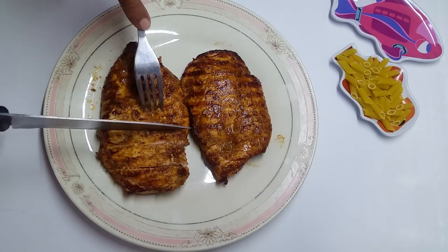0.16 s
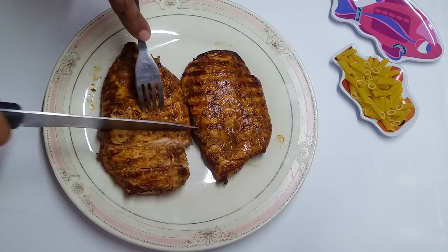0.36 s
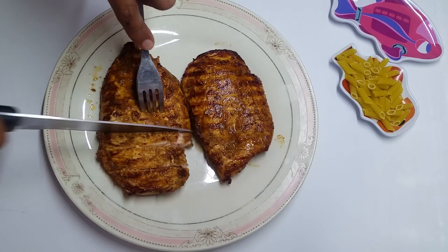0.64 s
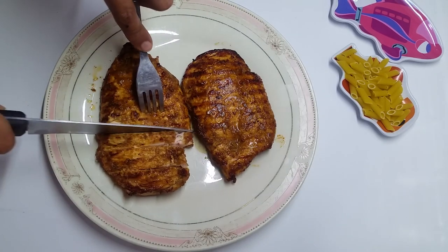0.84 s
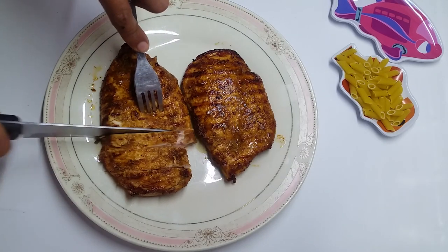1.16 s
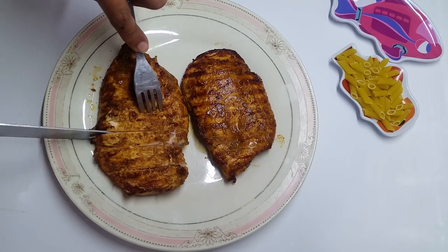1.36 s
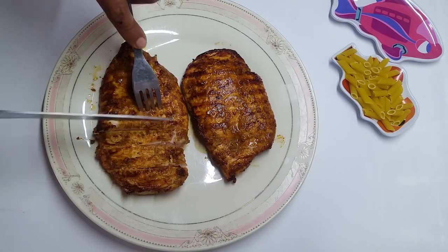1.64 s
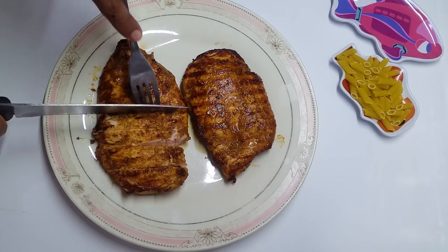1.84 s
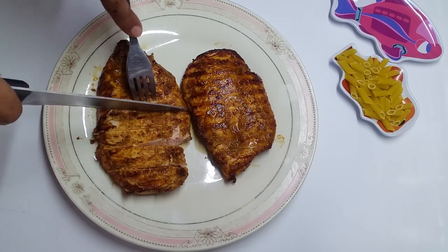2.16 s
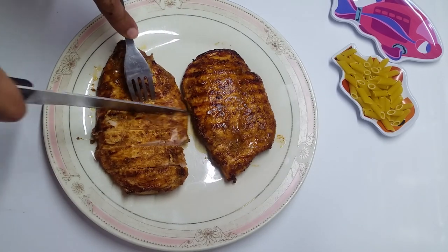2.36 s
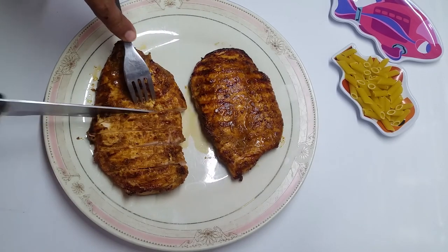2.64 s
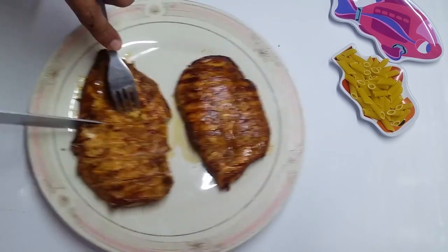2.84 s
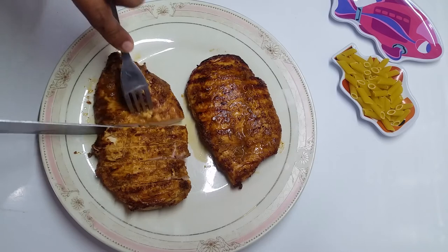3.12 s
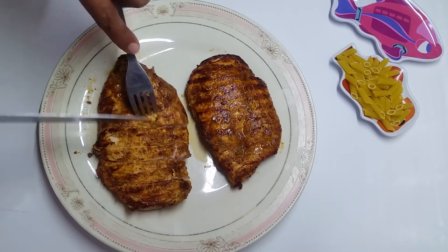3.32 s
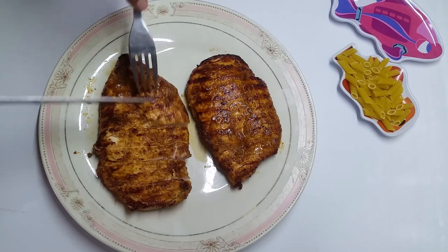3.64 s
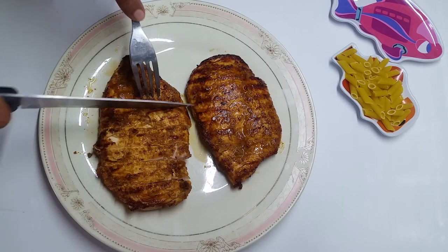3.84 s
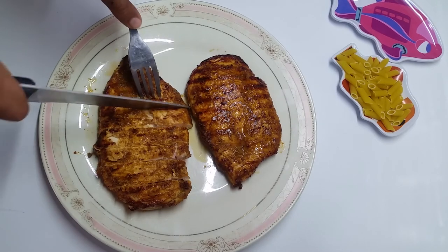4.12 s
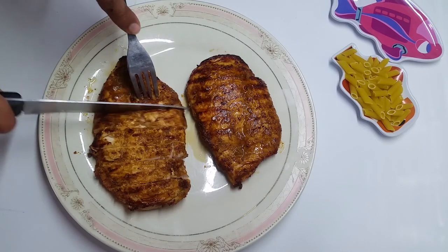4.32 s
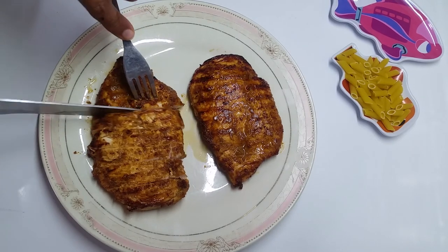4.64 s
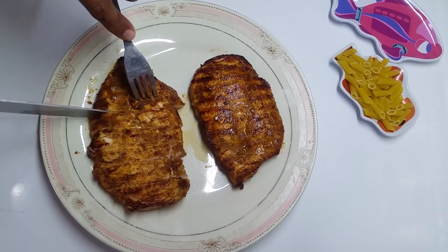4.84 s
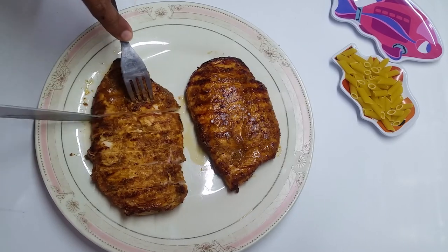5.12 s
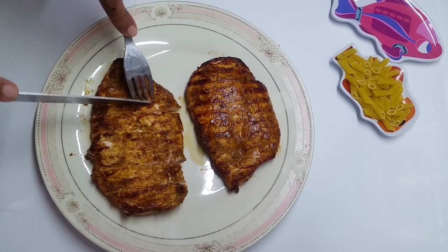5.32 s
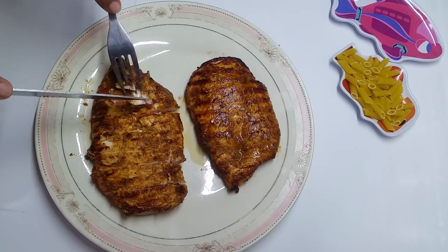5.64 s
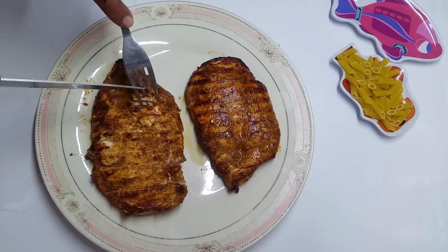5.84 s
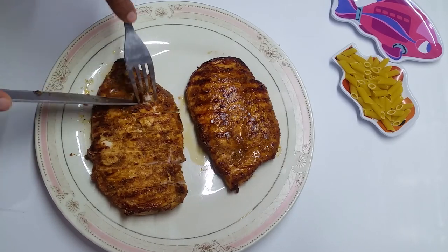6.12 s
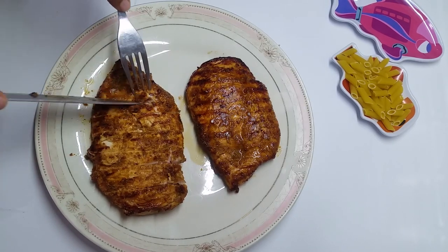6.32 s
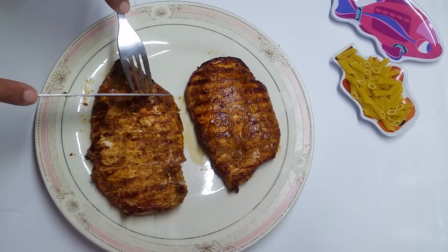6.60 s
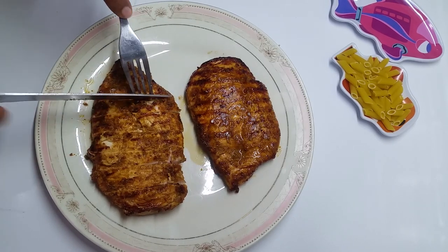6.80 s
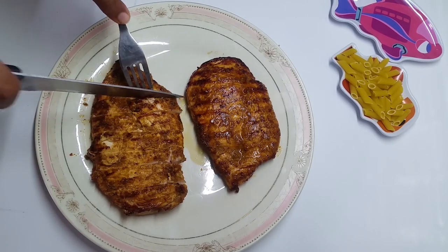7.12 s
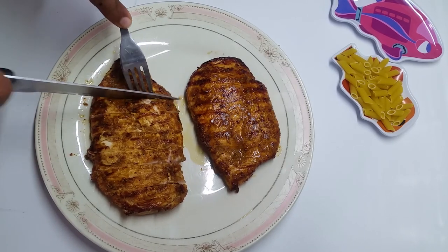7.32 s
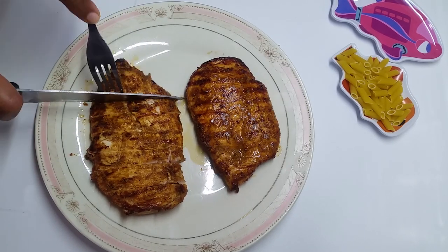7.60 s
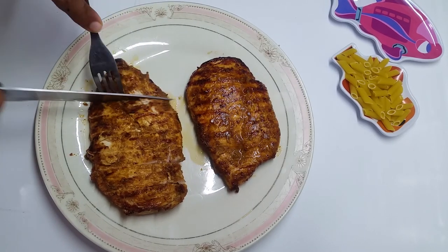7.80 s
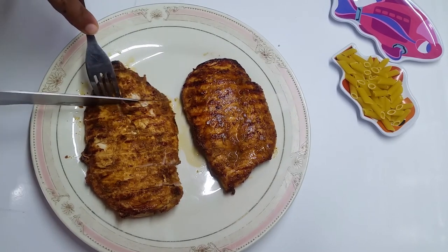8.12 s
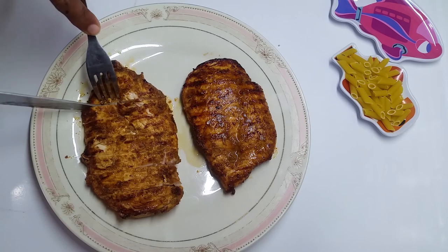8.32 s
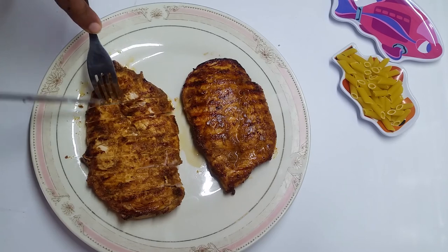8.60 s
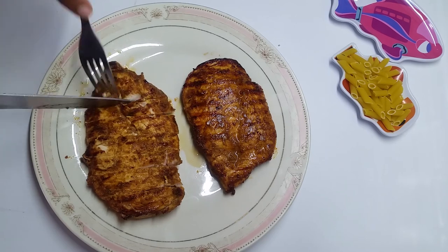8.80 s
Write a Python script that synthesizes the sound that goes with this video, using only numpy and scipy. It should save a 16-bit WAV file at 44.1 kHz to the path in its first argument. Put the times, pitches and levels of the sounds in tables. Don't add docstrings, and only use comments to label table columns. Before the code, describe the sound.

Steel cutlery scrapes and knocks a stoneware plate in busy strokes, then quiet taps and ticks, a steady fan hum, and one sharp final clack.

```python
import sys
import numpy as np
from scipy import signal
from scipy.fft import rfft, irfft
from scipy.io import wavfile
from scipy.ndimage import map_coordinates

SR = 44100
rng = np.random.default_rng(int(sys.argv[2]) if len(sys.argv) > 2 else 0)


def put_to_file(sound):
    columns = np.atleast_2d(sound).T
    safe = np.clip(columns, -1, 1)
    whole_steps = np.round(safe * 32767)
    wavfile.write(sys.argv[1], SR, whole_steps.astype(np.int16))


def voltage_ratio(decibels):
    exponent = np.asarray(decibels, float) / 20
    return 10 ** exponent


N = 394694

# (pitch [Hz], width [Hz], level [dB])
PLATE_MODES = [(680, 21, 2.5), (1210, 51, -2), (1468, 63, -2.5), (1662, 66, -3.5), (1960, 45, 3.5),
               (2320, 52, 1.5), (2525, 62, -2.5), (2760, 42, -3), (3574, 30, -6), (4550, 32, -9),
               (5400, 62, -30), (6700, 210, -38), (8000, 55, -21), (12900, 64, -23)]
RIM_MODES = [(1140, 40, -3), (1490, 40, -2), (1900, 36, 2), (2370, 45, -4), (2480, 45, -6), (2900, 36, -2),
             (3250, 60, -22), (3645, 28, 0), (4050, 80, -36), (4543, 36, -15), (5500, 45, -21),
             (6670, 110, -40), (8070, 28, -25)]
EDGE_MODES = [(600, 40, -2), (900, 60, -8), (1197, 70, 2), (1455, 36, 3), (1935, 40, 9), (2244, 47, 0),
              (2440, 36, 3), (2557, 90, 3), (2960, 45, -2), (3622, 34, 0), (4510, 36, -12), (5550, 50, -16),
              (6670, 110, -38), (8070, 28, -21)]
# (pitch [Hz], width [Hz], level [dB])
PINNED_MODES = [(1096, 28, -0.5), (1450, 44, 2.5), (2140, 69, -2.5), (2435, 37, 2.5), (2740, 26, -1),
                (3070, 40, -8), (3270, 35, -15), (3510, 35, -6.5), (4520, 36, -20), (5173, 60, -23),
                (5415, 60, -20), (6150, 72, -25), (8060, 50, -23)]
PRESSED_MODES = [(1205, 40, -5), (1500, 50, -5), (1596, 50, -9), (1803, 50, -9), (2013, 36, 2),
                 (2433, 45, -12), (2753, 40, -22), (3313, 40, -22), (3604, 40, -24)]
HELD_MODES = [(1213, 37, 0), (1420, 31, 12.5), (2045, 40, 2.5), (2347, 60, -3.5), (2570, 60, -6),
              (2730, 26, -3), (3400, 45, -12), (3880, 90, -27), (4600, 60, -19), (5150, 90, -29),
              (6040, 100, -34)]
LIFTED_MODES = [(1524, 26, 4), (1780, 30, 0), (2210, 50, -2), (2330, 61, -1), (3000, 50, -8),
                (3755, 45, -14), (4880, 40, -21), (6090, 70, -29), (7030, 55, -26), (8550, 90, -28),
                (9700, 80, -26), (10850, 45, -24), (12300, 70, -27), (14000, 70, -28)]
# (pitch [Hz], width [Hz], level [dB])
TABLE_MODES = [(85, 30, -3), (105.6, 34, 11.5), (175, 38, -3), (345, 81, 0), (494, 68, -6.5),
               (634, 110, -0.5), (952, 43, -1.5), (1030, 94, -5.5)]
BLADE_MODES = [(1480, 60, 2), (2050, 60, -2), (2390, 100, -1.5), (4270, 77, -7), (5950, 120, -11),
               (7300, 57, -6.5), (8700, 49, -7), (9400, 40, -7), (10480, 40, -2), (11660, 60, -5),
               (13120, 88, -2), (15000, 96, -7)]
FORK_MODES = [(2500, 25, -1), (4180, 320, -25.5), (6620, 67, -10), (8000, 87, -4), (8250, 44, -7),
              (8500, 45, -2), (9240, 38, -4), (10850, 46, -3), (11600, 54, -13), (12100, 91, -10),
              (12640, 50, -12), (13460, 35, -6), (14400, 62, -4), (15030, 55, -17)]

# (time [s], peak [dB], contact [s], mode nearest the struck spot [Hz], room [dB])
PLATE_BLOWS = [
    (.753, -16, 0.0072, 1480, -6),
    (.809, -23.5, 0.0022, 1640, -12),
]
RIM_BLOWS = [
    (5.688, -30, 0.0081, 1520, -8.5),
    (5.942, -29, 0.0046, 2480, -9),
]
EDGE_BLOWS = [
    (.99, -20.5, 0.0068, 1450, -10),
]
PINNED_BLOWS = [
    (5.349, -31, 0.0042, 1100, -3),
    (5.556, -36, 0.005, 2160, -9),
]
PRESSED_BLOWS = [
    (1.312, -32.5, 0.0037, 1530, -6.5),
]
HELD_BLOWS = [
    (8.176, -26.5, 0.006, 2045, -11),
]
LIFTED_BLOWS = [
    (8.715, -25, 0.0022, 1524, 0),
    (8.717, -9, 0.0016, 2340, -9),
]
TABLE_BLOWS = [
    (8.176, -25.5, 0.0041, 560, -11),
    (8.719, -18, 0.016, 910, -2.5),
]
BLADE_BLOWS = [
    (1.76, -34, 0.0012, 13120, -7),
    (6.708, -51, .0035, 10480, -9),
]
FORK_BLOWS = [
    (2.056, -39, 0.0043, 12640, -8),
    (7.137, -43, 0.0041, 10850, -4),
]

# (start [s], held [s], low plate hum [dB], upper ring [dB], hiss of the edge [dB])
STROKES = [(0, .04, -57, -59, -64), (.105, 0.024, -52, -66, -75), (.127, .035, -55.5, -69, -70),
           (.268, 0.025, -50.5, -53.5, -62), (.305, 0.018, -55, -63, -72), (.345, 0.034, -61, -63, -72),
           (.422, .065, -51.5, -60, -69), (.553, 0.021, -59, -61, -77), (.59, 0.035, -54, -49.5, -62),
           (.628, .022, -53, -48.5, -53.5), (.655, 0.013, -55, -50, -60), (.725, 0.04, -52, -55, -61),
           (.885, 0.035, -52, -49, -56.5), (1.03, 0.0067, -49, -52, -70), (1.12, 0.065, -75, -78, -77),
           (3.71, 0.033, -78, -78, -77), (3.885, .02, -70, -76, -77), (4.04, 0.027, -70, -72, -76),
           (4.26, .03, -81, -87, -76), (4.47, 0.026, -69, -69, -84), (4.645, 0.044, -72, -79, -76),
           (4.83, .05, -76, -83, -76), (5.07, 0.13, -72, -79, -79), (6.16, 0.033, -66, -66, -75),
           (6.26, 0.027, -67, -69, -78), (6.48, 0.1, -66, -68.5, -86), (8.0, 0.026, -70, -64, -81)]
# (start [s], held [s], ring [dB], high glaze whistle [dB], hiss [dB])
DRAGS = [
    (5.3, 0.044, -70, -76, -68),
    (5.385, 0.025, -62, -74, -72),
    (5.518, 0.007, -56.5, -68, -76),
    (5.533, 0.011, -52, -67, -72),
]
# (pitch
# [Hz], width [Hz], level [dB])
GLAZE_LOW = [(1480, 45, 1.5), (1800, 47, -14.5), (1960, 63, -13)]
GLAZE_UPPER = [(2000, 52, -7), (2155, 46, 1), (2296, 64, -2), (2420, 88, 3.5), (2734, 31, -7.5),
               (3630, 42, -19), (4230, 45, -14), (5160, 110, -24.5), (5260, 150, -21)]
GLAZE_PINNED = [(1100, 37, -1), (1520, 50, -2), (2140, 70, 1), (2430, 50, 1), (2750, 34, -6),
                (3000, 60, -3), (3360, 60, -8), (3550, 50, -6), (4610, 55, -10)]
GLAZE_PINNED_HIGH = [(5130, 70, 5), (5400, 100, 0), (6150, 170, -19)]
KNIFE_EDGE = [(8440, 560, -4), (10200, 450, -4), (12600, 980, -7), (14200, 1700, -2.5)]

# (time [s], peak [dB], centre [Hz])
TAPS = [(3.7852, -47, 1960), (4.1485, -56, 2200), (4.471, -49, 2070), (4.4994, -51, 2000),
        (6.0805, -51, 2000), (6.123, -50, 2160), (6.2931, -58, 2560), (6.6085, -50, 2150),
        (6.6388, -49, 2030), (7.4495, -54, 2140), (7.861, -51, 1960), (7.917, -56, 1500),
        (7.9987, -49, 1890), (8.078, -46, 2250), (8.1309, -42.5, 2020), (8.1334, -66, 2300),
        (8.141, -53, 1900), (8.1535, -46, 2200), (8.385, -41, 1160), (8.45, -47.5, 2000),
        (8.542, -46.5, 1920), (8.5744, -50, 2060), (8.6617, -53, 2030)]
# (time [s], peak [dB], centre [Hz])
TICKS = [(0.1809, -65, 14400), (0.2433, -59, 9500), (1.446, -57, 7600), (1.52, -54, 9150),
         (1.5853, -62, 9200), (2.0073, -62, 8070), (3.1453, -63, 9190), (3.5144, -65, 8620),
         (3.8876, -55, 8250), (3.9105, -54, 9110), (4.0502, -51, 14400), (4.0876, -39, 14700),
         (4.2288, -58, 8090), (4.2606, -53, 9770), (4.4392, -47.5, 7240), (4.4702, -58, 8090),
         (4.5405, -53, 11300), (4.6394, -54, 8770), (4.8249, -53, 12900), (5.0639, -53, 8060),
         (5.1228, -54, 9110), (5.655, -60, 7490), (5.685, -48, 13900), (5.7354, -59, 8860),
         (5.8047, -61, 8760), (6.2711, -55, 10200), (6.2946, -57, 8030), (7.0314, -59, 11000),
         (8.2676, -63, 7310)]

# (multiple of the motor speed, level [dB rms])
MOTOR_ORDERS = [(1, -63.5), (2, -57), (3, -47), (4, -57.5), (6, -53), (8, -58.5), (12, -62)]
# (pitch [Hz], width [Hz], level [dB])
BOOMS = [(78.5, 37, -60.5), (126, 6, -87), (233.7, 15, -57.5), (247.9, 2.8, -60), (313.5, 9.1, -58),
         (415.6, 11.4, -59.5), (646.4, 21, -65.5), (833, 3.4, -67.5)]
# (pitch [Hz], width [Hz], level [dB])
WHINES = [(2040, 15, -92), (2103, 7.9, -80), (2520, 10, -88), (2760, 14, -88), (5040, 5.5, -91),
          (7300, 11, -93), (8050, 60, -90.5), (9000, 87, -91)]
# (pitch [Hz], level per Hz [dB])
FAN_COLOUR = [(20, -16), (60, -17.5), (110, -5.5), (300, -4), (1100, -17.5), (2300, -34.5), (3600, -47),
              (5000, -79)]
# (pitch [Hz], level per Hz [dB])
HISS_COLOUR = [(1500, -35), (2600, -23), (3200, -0.5), (4000, -2), (5000, -3), (6300, -5), (10000, -4.5),
               (13000, -6)]
# (pitch [Hz], level per Hz [dB])
PORT_COLOUR = [(1500, -17), (3000, 2), (5000, -2), (7500, 6.5), (11000, -1), (14000, -6)]
# (pitch [Hz], time to fall 60 dB [s])
KITCHEN_T60 = [(100, 0.9), (400, 0.43), (1200, 0.54), (3000, 0.49), (7000, 0.53), (14000, 0.35)]


def rms_one(x):
    return x / np.sqrt(np.mean(x ** 2) + 1e-20)


def at_hz(points, hz):
    table = np.array(points)
    return np.interp(np.log(hz), np.log(table[:, 0]), table[:, 1])


def band(x, low_hz, high_hz):
    sos = signal.butter(2, [low_hz, min(high_hz, .47 * SR)], "band", fs=SR, output="sos")
    return signal.sosfilt(sos, x)


def drift(rate):
    steps = rng.standard_normal(900)
    return map_coordinates(steps, [np.arange(N) / SR * rate], order=3)


def coloured(spectrum):
    hz = np.maximum(np.fft.rfftfreq(N, 1 / SR), 1)
    white = rng.standard_normal(N)
    return rms_one(irfft(rfft(white) * voltage_ratio(at_hz(spectrum, hz)), N))


def resonance(x, hz, width_hz):
    r = np.exp(-np.pi * width_hz / SR)
    top = (1 - r * r) / 2
    return signal.lfilter([top, 0, -top], [1, -2 * r * np.cos(2 * np.pi * hz / SR), r * r], x)


def add(track, s, sound):
    at = round(s * SR)
    track[at:at + len(sound)] += sound[:N - at]


def struck_at(modes, spot_hz):
    hz, width_hz, db = np.transpose(modes)
    octaves = np.log2(hz / spot_hz)
    near_db = 7.5 * np.exp(-(octaves / 0.2) ** 2)
    return np.transpose([hz, width_hz * voltage_ratio(0.95 * near_db), db + 0.15 * near_db])


def ringing_modes(modes, contact_s, ring):
    t = np.arange(8192) / SR
    hz, db = modes[:, :1], modes[:, 2:]
    width_hz = np.clip(modes[:, 1:2], 24 + 0.002 * hz, 400)
    split, phase, slip = rng.random((3, len(hz), 1))
    gap_hz = hz * .003 * (.4 + split)
    lower = np.sin(2 * np.pi * ((hz - gap_hz) * t + phase))
    upper = np.sin(2 * np.pi * ((hz + gap_hz) * t + phase + 0.36 * (slip - .5)))
    pairs = lower + 0.83 * upper
    after = np.maximum(t - contact_s, 0)
    t60 = ring * np.log(1000) / np.pi / width_hz
    dying = .45 * voltage_ratio(-60 * after / t60) + .55 * voltage_ratio(-60 * after / .012)
    swell = np.minimum(t / (0.00016 + 1.9 / hz), 1)
    ringing = np.sum(voltage_ratio(db) * width_hz * pairs * dying * swell, axis=0)
    return ringing / np.abs(ringing).max()


def crack_of(modes, valley_db, crack_db):
    t = np.arange(8192) / SR
    hz, db = modes[:, :1], modes[:, 2:]
    bins = np.maximum(np.fft.rfftfreq(len(t), 1 / SR), 1)
    skirts = voltage_ratio(db) / (1 + ((bins - hz) / (.025 * hz + 75.0)) ** 2)
    colour = np.sqrt(np.sum(skirts ** 2, axis=0))
    below = (hz.min() / 2, db[0, 0] + 5)
    above = (min(hz.max() * 2, 21000), db[-1, 0] - 17)
    tops = [below, *sorted(map(tuple, modes[:, ::2])), above]
    colour = colour + voltage_ratio(at_hz(tops, bins) + valley_db)
    noise = rms_one(irfft(rfft(rng.standard_normal(len(t))) * colour))
    return voltage_ratio(crack_db - 11.5) * noise * voltage_ratio(-60 * t / 0.063) * np.minimum(t / 0.00014, 1)


def knocks():
    direct, sent = np.zeros((2, N))
    damped_db, free_db = -10, 2
    # (blows, modes, crack [dB], ring share, valley [dB])
    bodies = [(PLATE_BLOWS, PLATE_MODES, -4, .95, damped_db),
              (RIM_BLOWS, RIM_MODES, -5, 1.1, damped_db),
              (PINNED_BLOWS, PINNED_MODES, -4, .85, damped_db),
              (PRESSED_BLOWS, PRESSED_MODES, -7, .95, damped_db),
              (EDGE_BLOWS, EDGE_MODES, -5, 1.05, damped_db),
              (HELD_BLOWS, HELD_MODES, -7, .9, damped_db),
              (LIFTED_BLOWS, LIFTED_MODES, -3.5, 1.0, free_db),
              (TABLE_BLOWS, TABLE_MODES, -8, .71, free_db),
              (BLADE_BLOWS, BLADE_MODES, 3, 1.0, free_db),
              (FORK_BLOWS, FORK_MODES, 0.5, .8, free_db)]
    for blows, modes, crack_db, ring, valley_db in bodies:
        for s, db, contact_s, spot_hz, room_db in blows:
            struck = struck_at(modes, spot_hz)
            ringing = ringing_modes(struck, contact_s, ring)
            crack = crack_of(struck, valley_db, crack_db)
            add(direct, s - .0008, voltage_ratio(db) * (ringing + crack))
            after = np.maximum(np.arange(len(crack)) / SR - contact_s, 0)
            early = voltage_ratio(-60 * after / .1)
            add(sent, s - .0008, voltage_ratio(db + room_db) * (early * ringing + crack))
    return direct, sent


def stroke_levels(strokes):
    bite_db_per_s, lift_db_per_s = 800, 507
    out = np.zeros((3, N))
    for s, held_s, *levels_db in strokes:
        at = slice(max(int((s - .15) * SR), 0), int((s + held_s + .3) * SR))
        t = np.arange(at.start, at.stop)[:N - at.start] / SR - s
        shape = voltage_ratio(bite_db_per_s * np.minimum(t, 0) - lift_db_per_s * np.maximum(t - held_s, 0))
        out[:, at] += voltage_ratio(np.array(levels_db))[:, None] * shape
    return signal.lfilter([.005], [1, -.995], out + 1e-18)


def grit(per_s, uneven_db):
    sizes = voltage_ratio(uneven_db * np.minimum(rng.exponential(1, N), 5))
    signs = rng.choice([-1, 1], N)
    happens = rng.random(N) < per_s / SR
    return sizes * signs * happens * voltage_ratio(2.0 * drift(60))


def rung(x, modes):
    total = np.zeros(N)
    for k, (hz, width_hz, db) in enumerate(modes):
        total += voltage_ratio(db) * resonance(x, hz, width_hz) * (-1) ** k
    return rms_one(total)


def scrape():
    low, upper, hiss = stroke_levels(STROKES)
    ring, whistle, drag_hiss = stroke_levels(DRAGS)
    slips = grit(3000, uneven_db=0.7)
    fine = grit(5000, uneven_db=2.5)
    plate = rung(slips, GLAZE_UPPER)
    plate = plate + voltage_ratio(-8.0) * rms_one(band(slips, 1970, 3330))
    plate = plate + voltage_ratio(-23) * rms_one(band(fine, 3000, 5800))
    pinned = rung(fine, GLAZE_PINNED) + voltage_ratio(-7.5) * rms_one(band(fine, 2000, 3600))
    edge = voltage_ratio(-0.5) * rung(fine, KNIFE_EDGE)
    edge = edge + voltage_ratio(-4.0) * rms_one(band(band(fine, 7300, 11750), 7500, 11760))
    edge = edge + .5 * rms_one(band(fine, 11800, 15800))
    strokes = low * rung(slips, GLAZE_LOW) + upper * plate
    drags = ring * pinned + whistle * rung(fine, GLAZE_PINNED_HIGH)
    return strokes + drags + (hiss + drag_hiss) * edge


def taps_and_ticks():
    out = np.zeros(N)
    t = np.arange(2048) / SR
    for rows, t60, spread in ((TAPS, .022, 1.3), (TICKS, .008, 1.7)):
        for s, db, hz in rows:
            puff = rng.standard_normal(len(t)) * voltage_ratio(-60 * t / t60)
            for _ in range(2):
                puff = band(puff, hz / spread, hz * spread)
            add(out, s, voltage_ratio(db) * puff / np.abs(puff).max())
    return out


def squeak():
    climb_s, sag_s, top_hz, foot_hz = .08, 0.16, 11000, 8300
    t = np.arange(N) / SR - 7.91
    away = np.where(t < 0, (t / climb_s) ** 2, np.abs(t / sag_s) ** 1.4)
    fall = np.minimum(away, 1)
    phase = 2 * np.pi * np.cumsum(top_hz - (top_hz - foot_hz) * fall) / SR
    level = voltage_ratio(-73 - 7 * fall) * np.clip(5 * (1 - away), 0, 1)
    breath = rms_one(band(rng.standard_normal(N), 18, 350))
    return level * np.sin(phase) * breath


def hum():
    motor_hz, waver_db, fan_db, hiss_db = 48.88, .8, -53.5, -75.5
    turn = 2 * np.pi * np.cumsum(motor_hz + 0.095 * drift(0.729)) / SR
    out = np.zeros(N)
    for multiple, db in MOTOR_ORDERS:
        level = np.sqrt(2) * voltage_ratio(db + waver_db * drift(4))
        out += level * np.sin(round(multiple) * turn + rng.uniform(0, 2 * np.pi))
    air = rng.standard_normal(N)
    for hz, width_hz, db in BOOMS + WHINES:
        narrow = resonance(resonance(air, hz, width_hz), hz, 3 * width_hz)
        out += voltage_ratio(db) * rms_one(narrow)
    return out + voltage_ratio(fan_db + 5.0) * coloured(FAN_COLOUR) + voltage_ratio(hiss_db) * coloured(HISS_COLOUR)


def kitchen(x):
    t = np.arange(SR) / SR
    edges = 60 * 2 ** np.arange(0, 8.4, .75)
    white = rng.standard_normal((2, 2, SR))
    tail = np.zeros((2, SR))
    for k, (low_hz, high_hz) in enumerate(zip(edges, edges[1:])):
        t60 = at_hz(KITCHEN_T60, np.sqrt(low_hz * high_hz))
        tail += band(white[k % 2], low_hz, high_hz) * voltage_ratio(-60 * t / t60)
    tail = tail * np.clip((t - .006) / 0.00064, 0, 1) / np.sqrt(SR)
    return signal.fftconvolve(x[None], tail, axes=1)[:, :N]


def scene():
    direct, sent = knocks()
    small = scrape() + taps_and_ticks() + squeak()
    wet, apart = kitchen(sent + voltage_ratio(-12.5) * small)
    mid = direct + small + voltage_ratio(19.0) * wet + hum()
    side = voltage_ratio(-7.0) * band(apart - 0.27 * direct, 4150, 11000)
    side = side + voltage_ratio(-88) * coloured(PORT_COLOUR)
    return np.array([mid + side, mid - side])


def top_cut(x):
    return signal.sosfilt(signal.butter(12, 16650, fs=SR, output="sos"), x)


def record(dry):
    low_pass = signal.ellip(10, .5, 60, 15870, fs=SR, output="sos")
    mix = signal.sosfilt(low_pass, dry) - .0004
    return top_cut(mix)


dry = scene()
out = record(dry)
put_to_file(out)
```